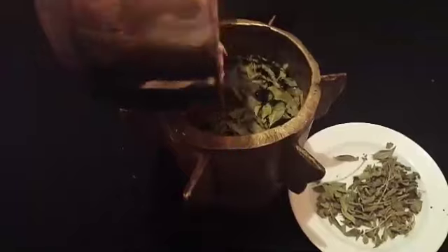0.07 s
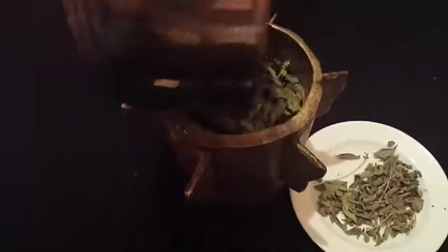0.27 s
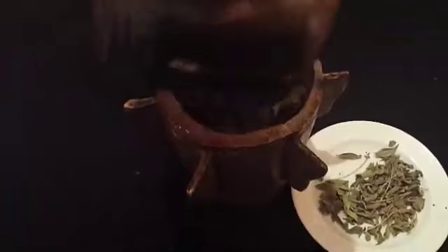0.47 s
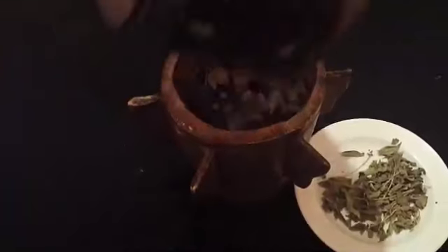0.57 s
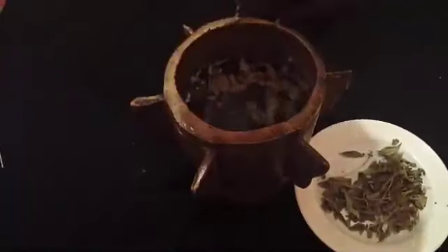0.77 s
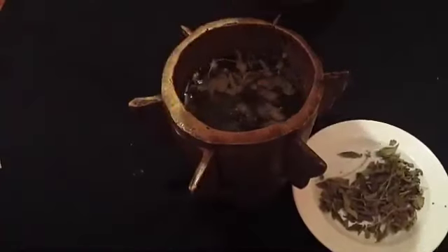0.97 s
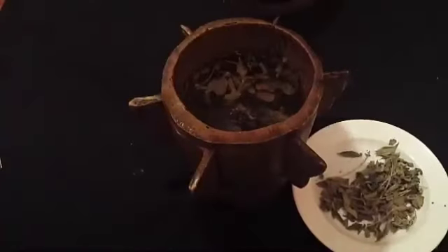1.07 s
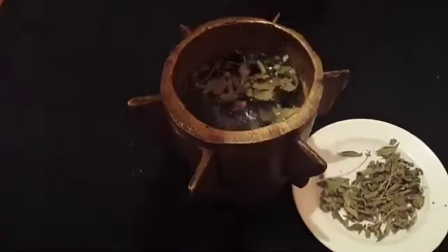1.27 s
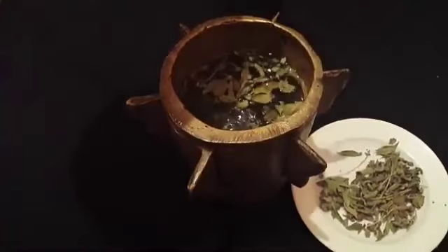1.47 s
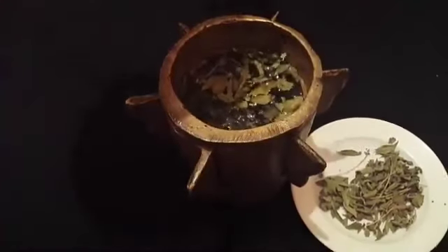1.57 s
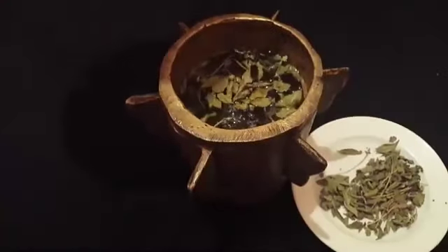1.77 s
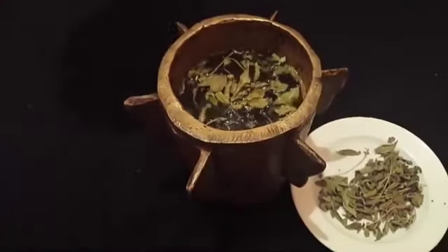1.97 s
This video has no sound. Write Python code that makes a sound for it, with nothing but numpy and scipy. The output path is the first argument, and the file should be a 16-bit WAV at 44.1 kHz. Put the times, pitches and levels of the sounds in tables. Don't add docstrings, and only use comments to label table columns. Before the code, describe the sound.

After a soft ladle knock, a harsh burst of steam crackles and spurts as hot metal quenches in water; it dies quickly into faint bubbling, droplet ticks and light clinks, heard by a close phone microphone indoors.

```python
import sys
import numpy as np
from scipy import signal
from scipy.fft import rfft, irfft
from scipy.io import wavfile
from scipy.ndimage import uniform_filter1d, map_coordinates

SR = 44100
rng = np.random.default_rng(int(sys.argv[2]) if len(sys.argv) > 2 else 0)


def voltage_ratio(level):
    return 10 ** (np.asarray(level, float) / 20)


def transcribe(signal):
    frames = np.atleast_2d(signal).T
    limited = np.clip(frames, -1, 1)
    pcm = np.round(limited * 32767).astype(np.int16)
    wavfile.write(sys.argv[1], SR, pcm)


N = 88420
T = np.arange(N) / SR

# (frequency [Hz], level [dB per Hz])
ROOM_SPECTRUM = [(25, -1), (55, -9.5), (200, -9), (520, -16.5), (2000, -26.5), (4400, -18.5), (10000, -23),
                 (15500, -35.5)]
# (frequency [Hz], width [Hz])
PORT_MODES = [(4300, 307), (4680, 242)]
PORT_GAIN_DB = (10.5, -3.5)
# (time [s], level [dB], treble tilt [dB per octave], crack level [dB])
KNOCKS = [
    (0.0576, -34.5, -2, -73),
    (1.31, -54, 16, -35),
    (1.482, -51, 19, -37),
    (1.535, -63, 3, -41),
    (1.664, -37.5, 3, -32),
]
# (frequency [Hz], level [dB], T60 [s])
LADLE_MODES = [(115, -19.5, 0.21), (160, -14.5, 0.095), (267, -5, 0.18), (322, -43, 0.15),
               (593, -13.5, 0.051), (800, -3, 0.021), (1045, -25.5, 0.75), (1080, -43, 0.057),
               (1910, -27, 0.049), (2420, -28, .4)]
# (time [s], peak level [dB], centre [Hz])
TICKS = [(0.001, -51, 4750), (1.515, -58, 9000), (1.27, -38.5, 3020), (1.345, -53, 2730),
         (1.484, -45, 3600), (1.551, -44, 4500), (1.603, -38, 4120), (1.628, -40.5, 3980),
         (1.666, -40.5, 5000), (1.694, -58, 4300), (1.737, -42, 4070), (1.757, -50, 4100),
         (1.772, -46, 4100), (1.79, -47, 4200), (1.807, -47, 4200), (1.821, -51, 4300), (1.877, -53, 4500),
         (1.883, -45.5, 5880), (1.885, -53.5, 9930), (1.925, -52, 4350), (1.93, -60, 4340),
         (1.985, -60.5, 4130)]
# (time [s], level [dB], decay [s])
SNAP = (1.884, -52, .0005)
# (time [s], level [dB], centre [Hz])
VENT = [
    (1.19, -65, 5200),
    (1.235, -56.5, 5050),
    (1.26, -50.5, 4720),
    (1.345, -55, 4050),
    (1.39, -59, 3150),
    (1.425, -57.5, 4027),
    (1.5, -72, 4260),
    (1.58, -92, 4150),
]
# (time [s], level [dB], share of deep thump [dB])
BOIL = [(0.17, -55, 15), (0.192, -51.5, -39), (0.246, -27, -5.5), (0.41, -26.5, -1), (0.5, -30, -6.5),
        (0.568, -31.5, -3), (0.61, -25, -12), (0.632, -27, -4.5), (0.692, -36, 1), (0.818, -30.5, 0),
        (0.936, -30.5, -4.5), (1.064, -40, 4), (1.128, -34.5, -0.5), (1.168, -45, 11), (1.532, -51.5, 4),
        (1.644, -47.5, 3), (1.662, -57.5, 9.5), (1.8, -47.5, -6)]
# (time [s], level [dB], pitch [Hz], length [s])
GULPS = [
    (.25, -37, 130, .03),
    (.341, -24, 295, .03),
    (.362, -31, 365, .035),
    (.376, -24, 290, .008),
    (.396, -23, 270, .047),
    (.825, -22, 280, .019),
    (1.609, -37, 283, .026),
]
# (frequency [Hz], width [Hz], level [dB], drift over time [dB per s])
WALL_MODES = [(575, 47, -6.5, 4.5), (800, 230, -13.5, -12), (350.5, 150, -15.5, -12.5), (1042, 180, -2, 13),
              (1167, 45, -1, 6), (1283, 82, -5, -7), (1590, 190, -1.5, -2.5), (2663, 390, -3, -4.5)]
# (frequency [Hz], width [Hz], level [dB])
HOLLOW_MODES = [(98, 40, -23), (171, 37, -13), (201.6, 23.8, -12), (270.4, 21, -4.5)]
# (time [s], level [dB])
STEAM_FLOW = [(0.15, -49), (0.164, -56), (0.19, -27), (0.262, -29), (0.282, -24.5), (0.308, -32),
              (0.438, -24), (0.598, -27), (0.618, -23.5), (0.762, -34), (0.818, -24), (0.942, -34),
              (0.952, -37), (1.01, -51.5), (1.073, -61), (1.077, -36), (1.18, -56.5), (2.0, -82.5)]
# (time [s], level [dB], length [s], centre [Hz])
SPURTS = [(0.1446, -25.5, 0.0024, 10500), (0.192, -37, 0.0081, 4660), (0.206, -15, 0.011, 5050),
          (0.227, -23, 0.0044, 4700), (0.242, -29, 0.0078, 4600), (0.262, -27, 0.006, 4510),
          (0.273, -29, 0.0055, 4400), (0.28, -19, 0.0098, 5400), (0.334, -39, 0.0035, 4600),
          (0.417, -24, 0.0032, 4380), (0.426, -20.5, 0.022, 4500), (0.487, -23, 0.0051, 4400),
          (0.492, -21, 0.0044, 4330), (0.517, -24.5, 0.012, 4350), (0.538, -23, 0.0066, 4400),
          (0.553, -17, 0.0087, 4520), (0.57, -20, 0.0059, 4200), (0.588, -16, 0.0084, 4550),
          (0.598, -19, 0.031, 3260), (0.626, -26.5, .011, 4700), (0.643, -24.5, 0.022, 4300),
          (0.692, -18.5, 0.0054, 4770), (0.712, -17.5, 0.0033, 12000), (0.719, -17, 0.0046, 4700),
          (0.7273, -20, 0.0072, 4300), (0.7545, -26.5, 0.0059, 4530), (0.772, -28.5, 0.018, 5060),
          (0.818, -19, 0.011, 6200), (0.867, -25, 0.011, 4470), (0.894, -30, 0.0049, 4440),
          (0.937, -29, 0.0055, 4470), (0.953, -17.5, 0.0066, 7560), (0.958, -33, 0.0067, 4650),
          (1.0748, -17, 0.0028, 8600), (1.078, -25.5, 0.0071, 4660), (1.086, -18, 0.0075, 5700),
          (1.111, -38, 0.028, 4360), (1.402, -54, 0.098, 6350), (1.55, -64, 0.27, 10760),
          (1.612, -59.5, 0.027, 8300), (1.658, -61, 0.011, 8300), (0.975, -54, 0.0975, 4450)]
# (frequency [Hz], level [dB per Hz])
HISS_SPECTRUM = [(500, -51), (1500, -5.5), (2500, -2), (4500, 4.5), (7000, 5.5), (10000, -0.5),
                 (14000, -2.5), (16000, -30.5)]


def unit(x):
    return x / np.sqrt(np.mean(x ** 2))


def band(x, hz, width_hz):
    b, a = signal.iirpeak(min(hz, 0.4 * SR), hz / width_hz, fs=SR)
    return signal.lfilter(b, a, x)


def colour(x, points):
    hz, db = np.array(points, float).T
    f = np.arange(N // 2 + 1) * SR / N + 1
    return irfft(rfft(x) * voltage_ratio(np.interp(np.log(f), np.log(hz), db)), N)


def curve(table, col):
    p = np.array(table, float)
    return np.interp(T, p[:, 0], p[:, col])


def walk(rate_hz):
    hold = int(SR / rate_hz)
    steps = np.repeat(rng.standard_normal(N // 20), hold)[:N]
    return unit(uniform_filter1d(uniform_filter1d(steps, hold), hold))


def grains(per_s, scatter_db, apart):
    fires = rng.random((3, N)) < per_s / SR
    size_db = np.minimum(scatter_db * rng.exponential(size=(3, N)), 12)
    g = fires * rng.standard_normal((3, N)) * voltage_ratio(size_db)
    share = np.clip(apart, 0, 1)
    return unit(np.sqrt(1 - share) * g[0] + np.sqrt(share) * g[1:])


def gate(start_s, length_s, attack_s, release_s):
    d = T - start_s
    return np.clip(d / attack_s, 0, 1) * np.exp(-np.clip(d - length_s, 0, None) / release_s)


def room_floor():
    noise = [unit(colour(rng.standard_normal(N), ROOM_SPECTRUM)) for _ in range(2)]
    return np.array(noise) * voltage_ratio(-68 + 2.5)


def hum():
    phase = 2 * np.pi * 48.5 * T
    tone = voltage_ratio(-65) * (np.sin(phase) + voltage_ratio(-5) * np.sin(2 * phase))
    return tone * np.array([[1.6], [-0.3]])


def reflections(dry):
    t60_s, highpass_hz = 0.035, 2500
    d = T[:SR // 8]
    tails = rng.standard_normal((2, len(d))) * np.exp(-np.log(1000) * d / t60_s) * (d > 0.001)
    bright = signal.lfilter(*signal.butter(1, highpass_hz, "high", fs=SR), dry)
    return signal.fftconvolve(bright, unit(tails) / np.sqrt(len(d)), axes=1)[:, :N]


def microphone_ports(near):
    sway = voltage_ratio(2.5 * walk(14))
    low, high = PORT_MODES
    ports = []
    for side, db in zip(near, PORT_GAIN_DB):
        ring = band(side, *low) * sway + band(side, *high) / sway
        ports.append(side + voltage_ratio(db) * ring)
    ports = np.array(ports)
    ports[1] += voltage_ratio(-5) * band(near[1], 9600, 3300)
    return ports


def knocks():
    out = 0
    rumble = band(band(rng.standard_normal(N), 160, 190), 170, 400)
    for s, db, tilt_db, crack_db in KNOCKS:
        d = np.clip(T - s, 0, None)
        for hz, mode_db, t60_s in LADLE_MODES:
            octaves = min(np.log2(hz / 1000), 2 * (1000 / hz - 1))
            decay = np.exp(-np.log(1000) * d / t60_s)
            out = out + voltage_ratio(db + mode_db + tilt_db * octaves) * np.sin(2 * np.pi * hz * d) * decay
        out = out + voltage_ratio(crack_db) * np.sin(2 * np.pi * 1250 * d) * np.exp(-d / 0.0019)
        out = out + voltage_ratio(db - 3 - 2 * tilt_db) * rumble * gate(s, 0.0014, 0.00032, 0.11)
    return out


def ticks():
    snap_s, snap_db, decay_s = SNAP
    out = band(rng.standard_normal(N), 8000, 12000) * voltage_ratio(snap_db) * gate(snap_s, 0, 0.0001, decay_s)
    for s, db, hz in TICKS:
        t = np.clip(T - s, 0, None)
        shape = np.minimum(t * hz / 2, 1) ** 2 * np.exp(-t * hz / 1.88)
        out = out + voltage_ratio(db + 4) * np.sin(2 * np.pi * hz * t) * shape
    return out


def vent():
    hz = curve(VENT, 2) * (1 + 0.013 * walk(60))
    carrier = np.exp(2j * np.pi * np.cumsum(hz) / SR)
    flutter = walk(1600) + 1j * walk(1600)
    is_open = (T > VENT[0][0]) * (T < VENT[-1][0])
    return unit((carrier * flutter).real) * voltage_ratio(curve(VENT, 1) + 4.5 * walk(70)) * is_open


def pot_wall():
    pops = grains(5000, 3.5, 0.2) * voltage_ratio(1.74 * walk(60.09))
    out = 0
    for k, (hz, width_hz, db, drift_db) in enumerate(WALL_MODES):
        level_db = db + drift_db * (T - 1.13) + 1.5 * walk(23.77)
        out = out + (-1) ** k * voltage_ratio(level_db) * band(pops, hz, width_hz) / np.sqrt(width_hz)
    return unit(out)


def pot_hollow():
    thumps = grains(2000, 4.9, 0.073) * voltage_ratio(walk(32))
    out = 0
    for hz, width_hz, db in HOLLOW_MODES:
        mode = band(band(thumps, hz, 2 * width_hz), hz, 2.68 * width_hz)
        out = out + voltage_ratio(db) * mode / np.sqrt(width_hz)
    return unit(out)


def boil():
    start_s, end_s = BOIL[0][0], 1.69
    mix = voltage_ratio(-2.21) * pot_wall() + voltage_ratio(curve(BOIL, 2) - 6) * pot_hollow()
    out = gate(start_s, end_s - start_s, 0.01, 0.025) * voltage_ratio(curve(BOIL, 1)) * mix
    wobble_s = np.cumsum(1 + 0.04 * walk(50)) / SR
    for s, db, hz, length_s in GULPS:
        shape = voltage_ratio(db + 1.2 * walk(70)) * gate(s, length_s, 0.006, 0.005)
        out = out + shape * np.sin(2 * np.pi * hz * wobble_s)
    return signal.sosfilt(signal.butter(3, 70, "high", fs=SR, output="sos"), out)


def spurts():
    spray = grains(30000, 1.2, 0.2) * voltage_ratio(1.3 * walk(400))
    out = 0
    for s, db, length_s, hz in SPURTS:
        shape = gate(s, length_s, min(0.0015, length_s / 4), 0.00043)
        puff = band(band(spray, hz, hz ** 2 / 20000), hz, 1.8 * hz) * shape
        out = out + voltage_ratio(db - 6) * puff * np.sqrt(2 * np.sum(shape ** 2) / np.sum(puff ** 2))
    return out


def steam():
    fizz = colour(grains(11000, 4, 0.75) * voltage_ratio(1.3 * walk(110)), HISS_SPECTRUM)
    flicker = sum(0.15 * walk(80) * band(fizz, hz, 0.5 * hz) for hz in 1300 * 1.5 ** np.arange(7))
    flow = voltage_ratio(curve(STEAM_FLOW, 1) + 0.2) * (T > STEAM_FLOW[0][0])
    return unit(fizz + flicker) * flow + spurts()


def scene():
    dry = knocks() + ticks() + boil() + steam()
    lag_s = 0.00007
    late = voltage_ratio(0.08) * map_coordinates(dry[0], [np.arange(N) - lag_s * SR], mode="nearest")
    near = np.array([late, dry[1]]) + voltage_ratio(-8) * reflections(dry)
    jet = voltage_ratio(np.array([[7], [3]])) * vent()
    return microphone_ports(near) + jet + room_floor() + hum()


def top_cut(x):
    return signal.sosfilt(signal.butter(12, 15740, fs=SR, output="sos"), x)


def record(dry):
    rounded = np.tanh(1.2 * dry) / 1.2
    lowpass = signal.ellip(7, 0.5, 38, 14750, fs=SR, output="sos")
    return top_cut(signal.sosfilt(lowpass, rounded))


dry = scene()
out = record(dry)
transcribe(out)
```